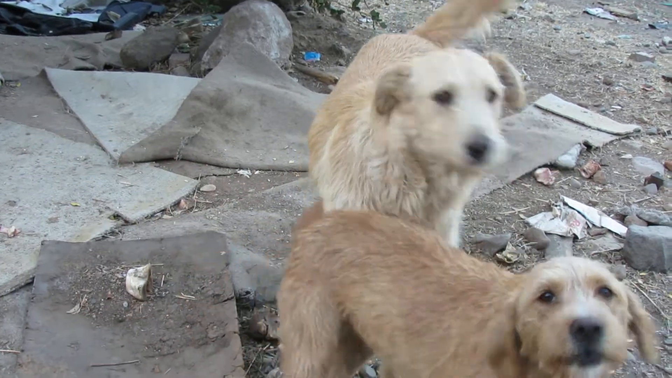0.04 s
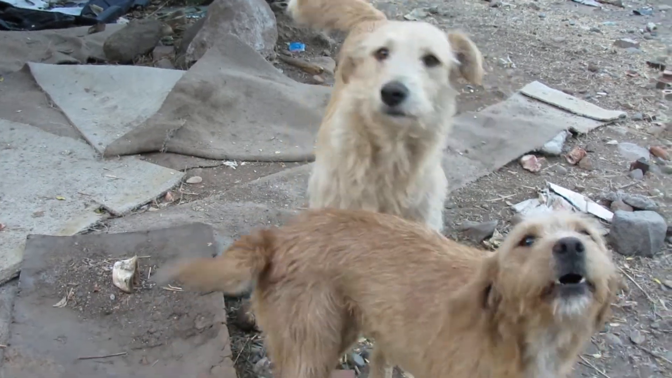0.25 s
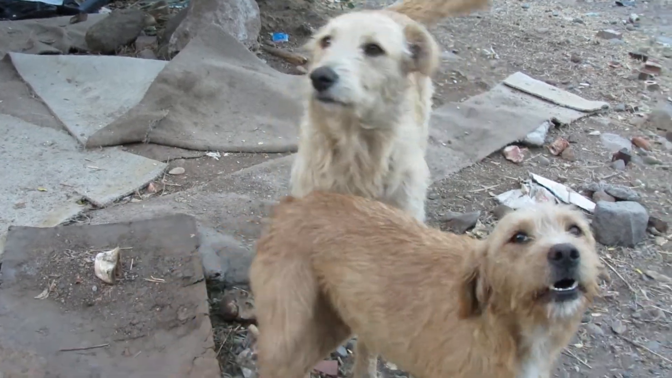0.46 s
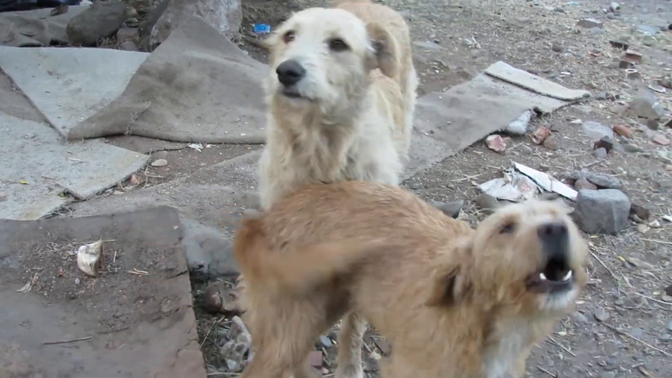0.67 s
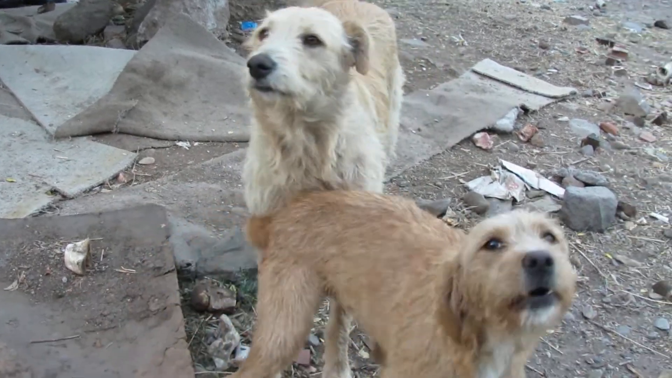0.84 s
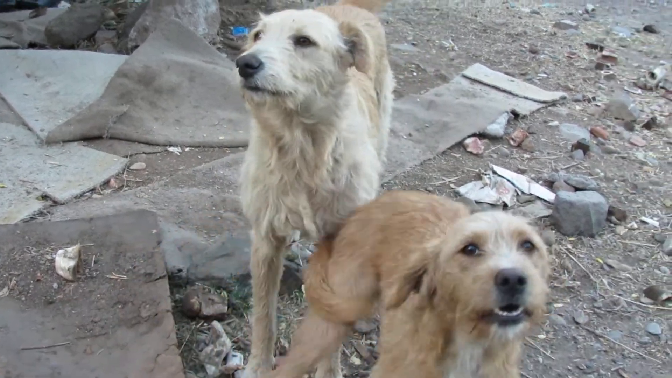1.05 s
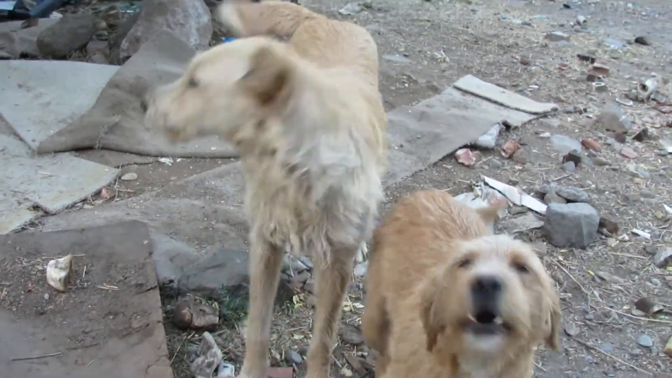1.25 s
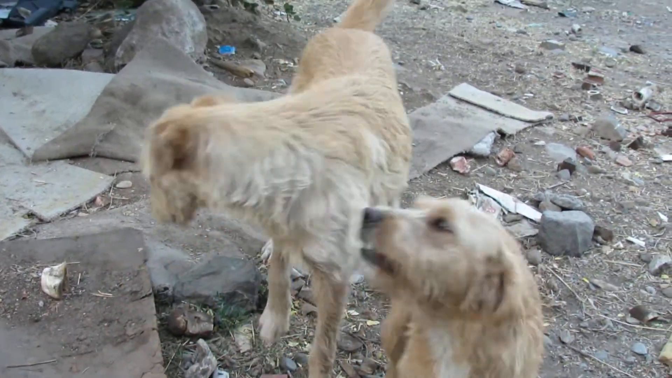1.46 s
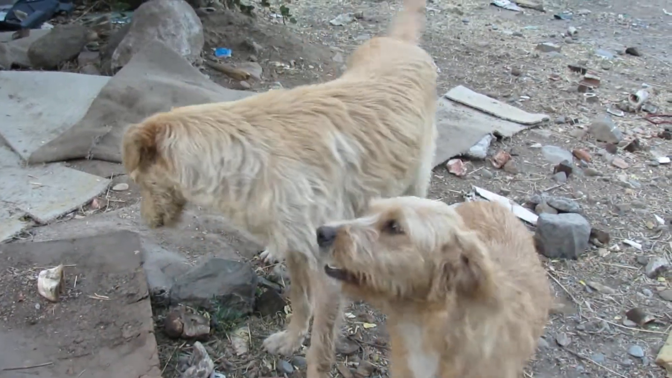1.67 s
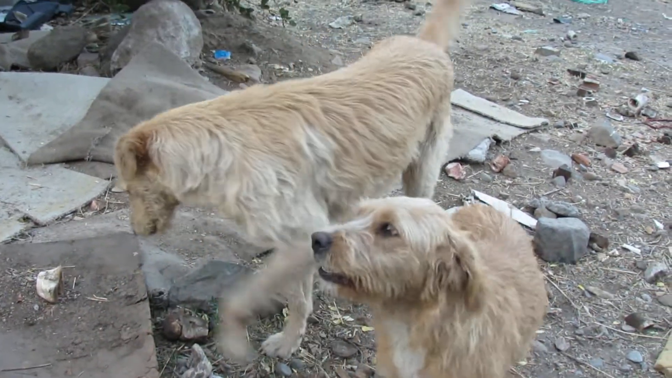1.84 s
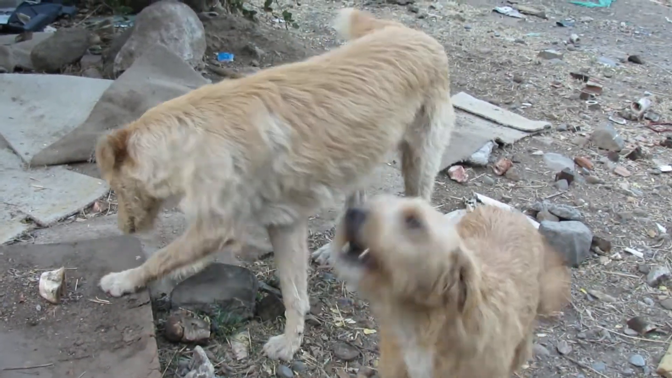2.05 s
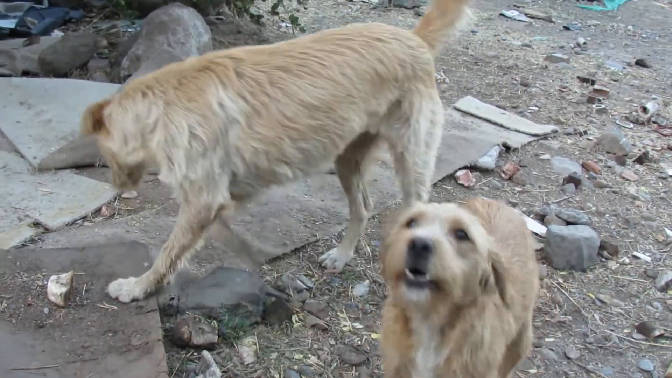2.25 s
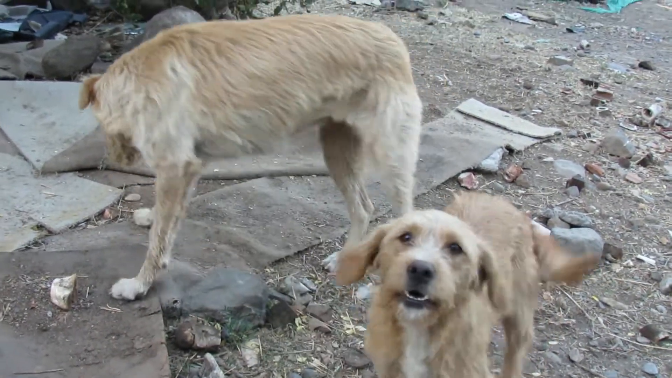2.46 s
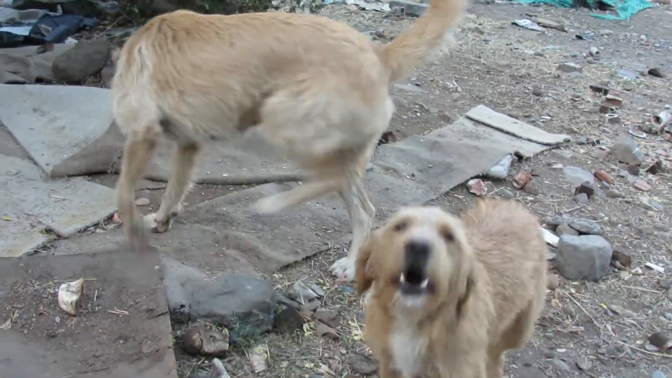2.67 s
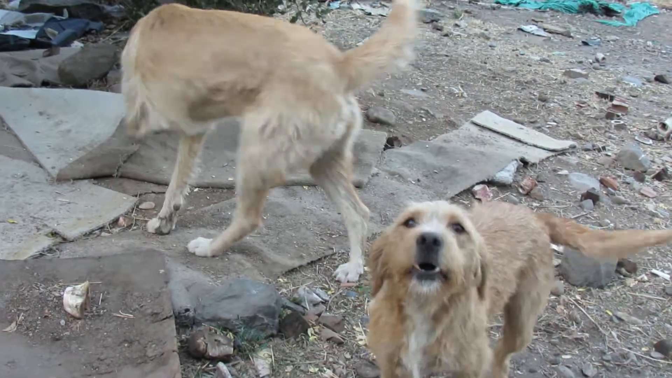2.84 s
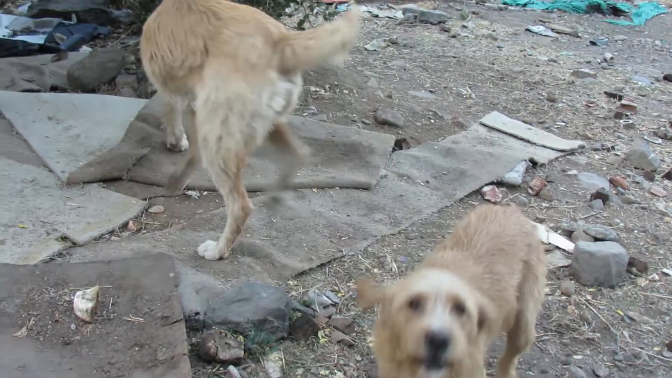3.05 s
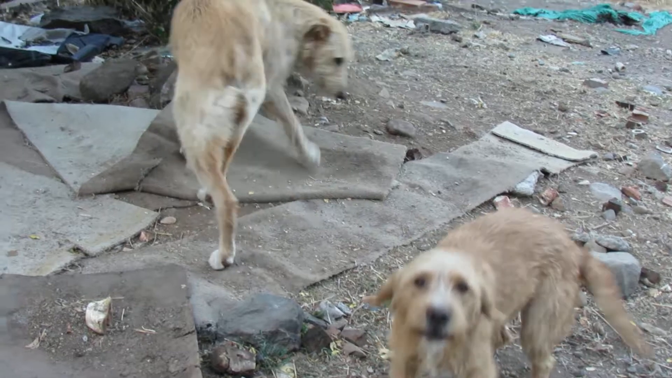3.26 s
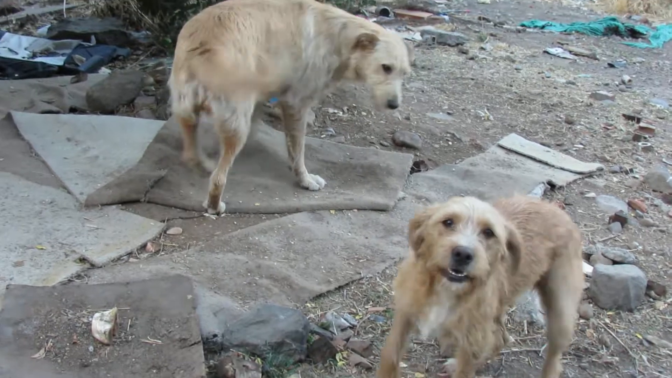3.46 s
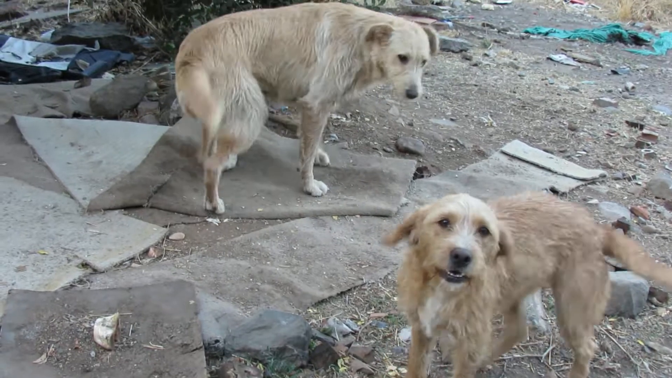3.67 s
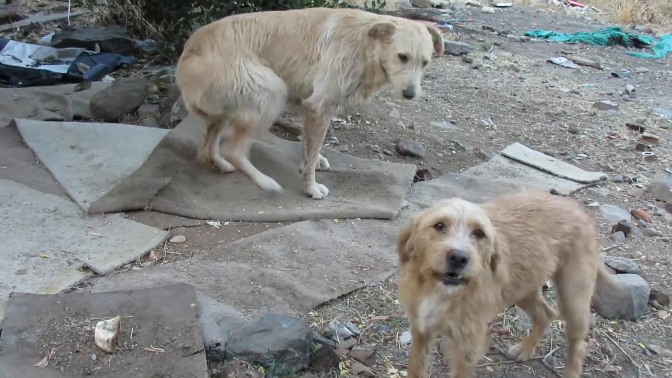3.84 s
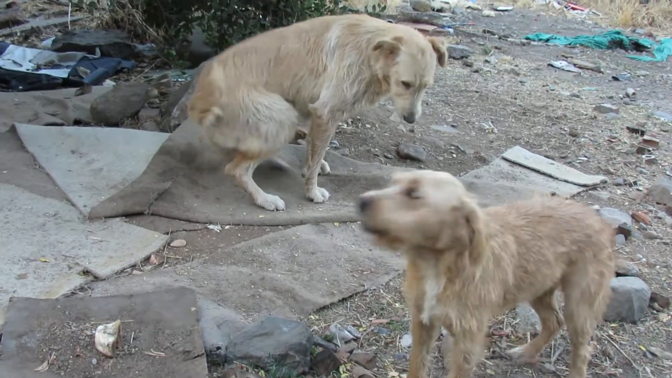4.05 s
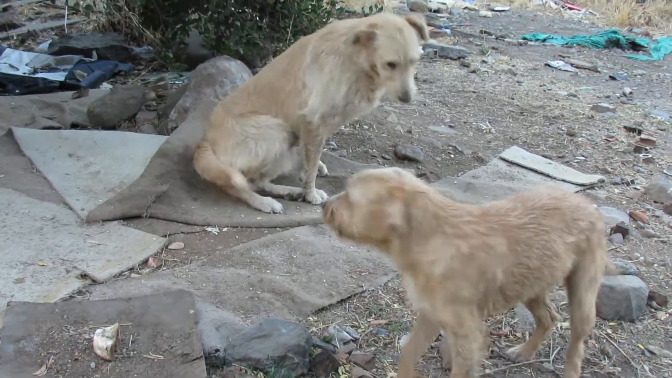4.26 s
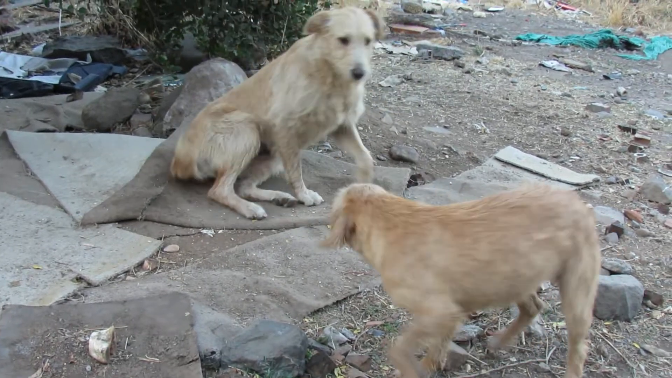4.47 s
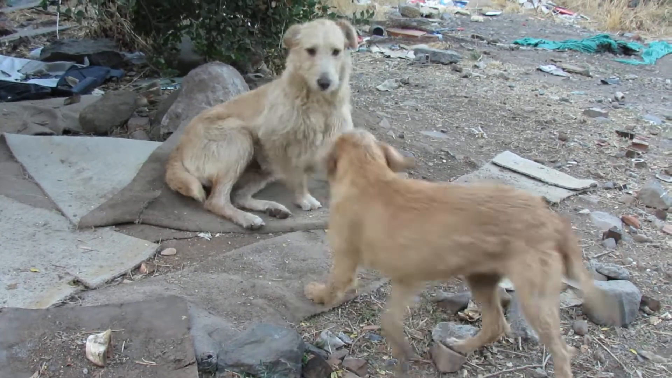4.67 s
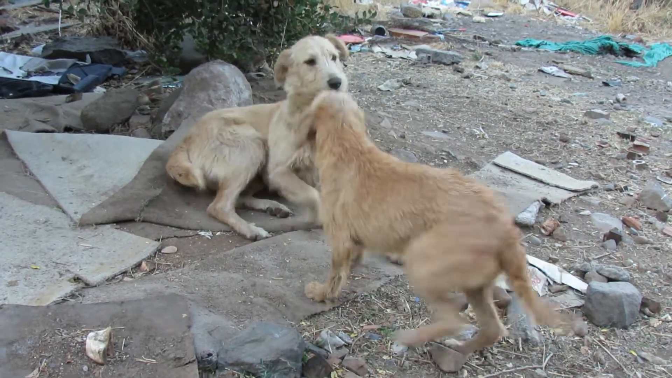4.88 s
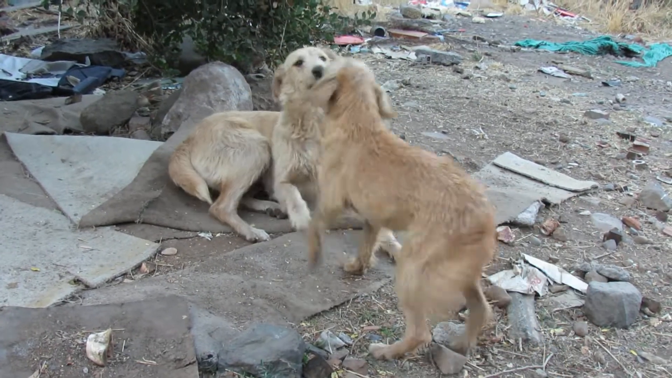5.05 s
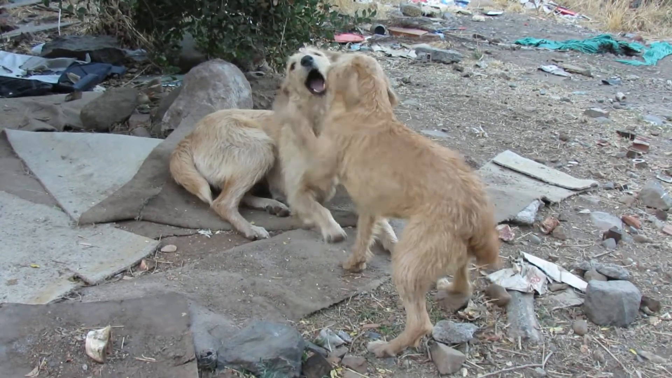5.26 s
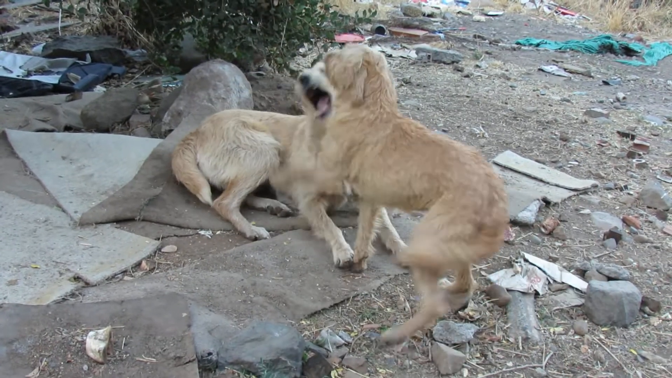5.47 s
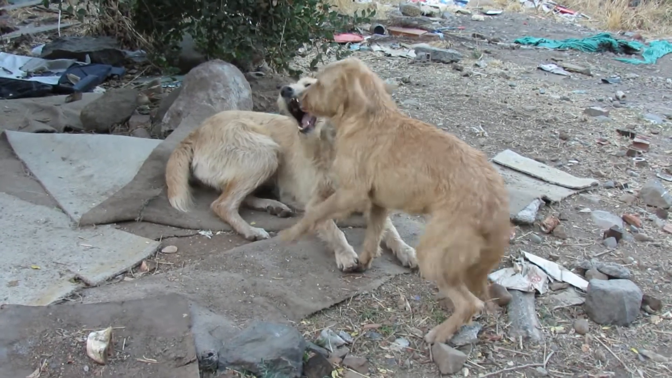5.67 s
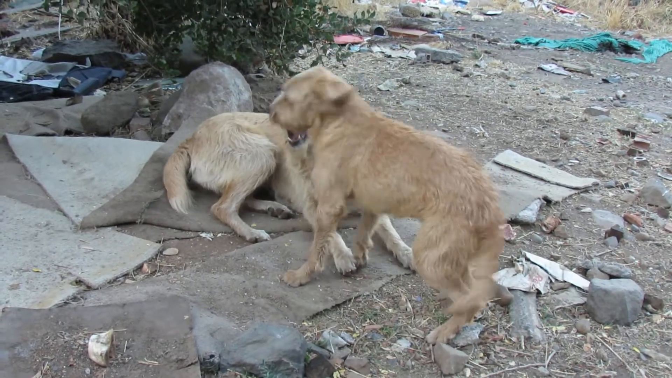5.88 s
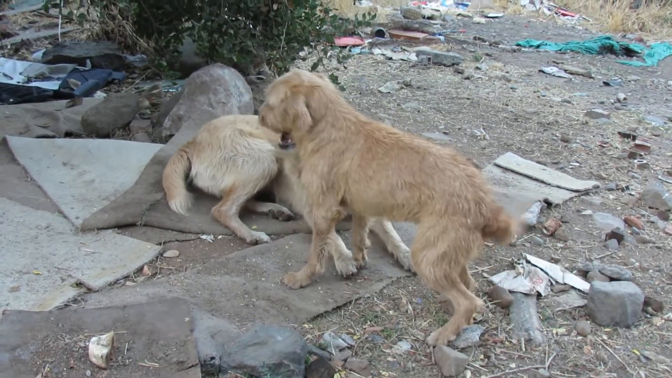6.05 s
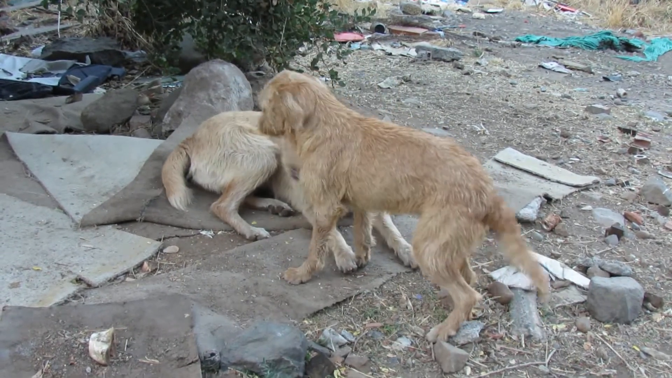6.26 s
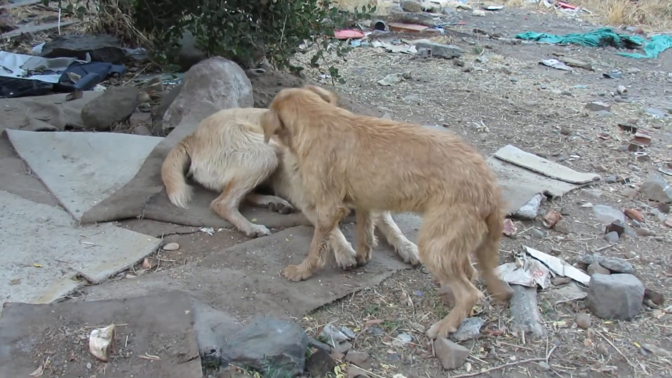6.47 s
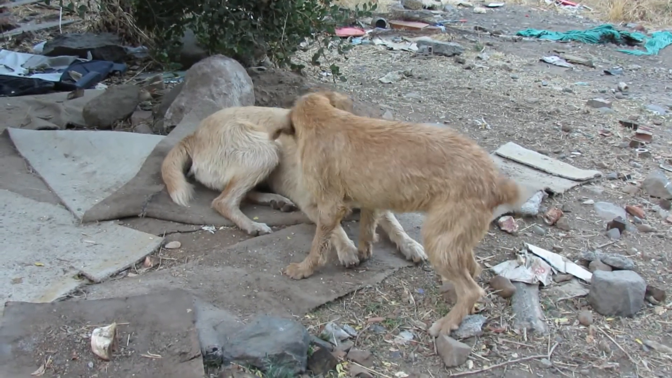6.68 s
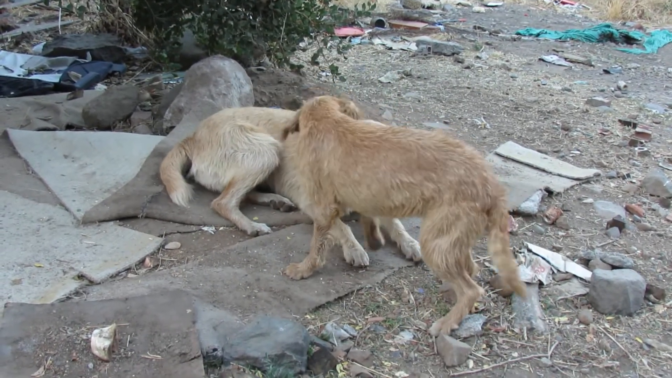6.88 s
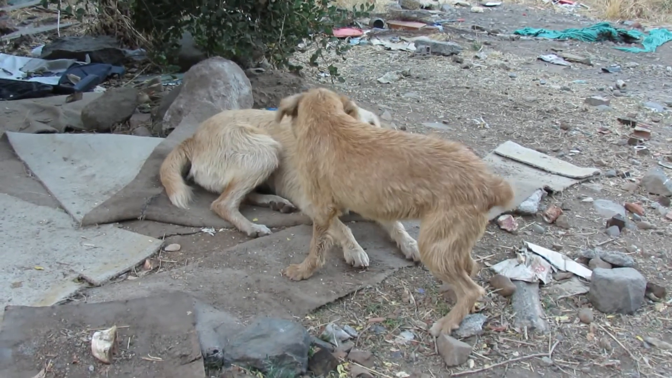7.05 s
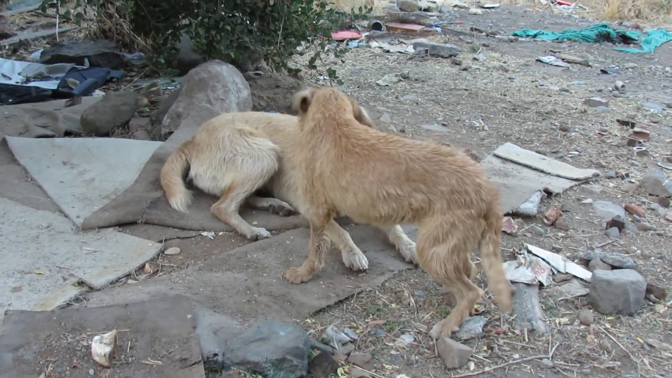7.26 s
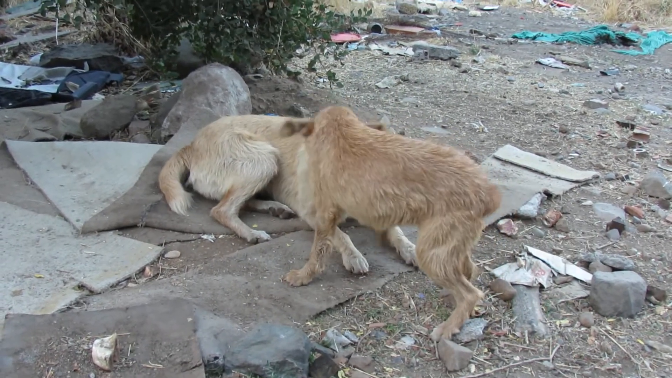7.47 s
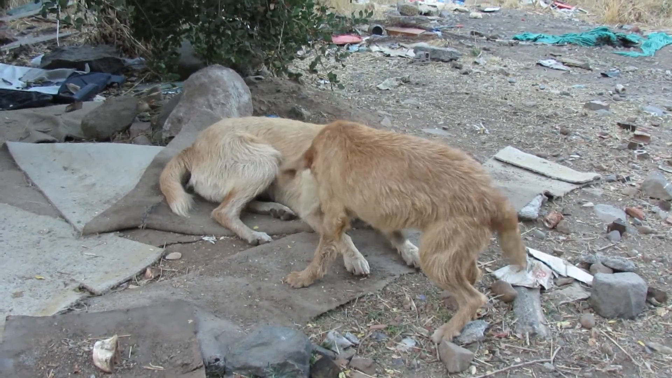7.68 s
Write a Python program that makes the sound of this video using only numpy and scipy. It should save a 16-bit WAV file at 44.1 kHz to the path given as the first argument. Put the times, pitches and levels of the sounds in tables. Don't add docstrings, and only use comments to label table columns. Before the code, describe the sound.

Rough, spaced dog barks close by on littered ground, paws crunching grit, glass tinkling briefly, then a thin whine and swelling distant hiss.

```python
import sys
import numpy as np
from scipy import signal
from scipy.fft import rfft, irfft, next_fast_len
from scipy.io import wavfile
from scipy.ndimage import uniform_filter1d, map_coordinates

SR = 44100
rng = np.random.default_rng(int(sys.argv[2]) if len(sys.argv) > 2 else 0)


def bounce(signal):
    frames = np.transpose(np.atleast_2d(signal))
    limited = np.clip(frames, -1, 1)
    pcm = np.round(limited * 32767).astype(np.int16)
    wavfile.write(sys.argv[1], SR, pcm)


def invert_db(level):
    return 10 ** (np.asarray(level, dtype=float) / 20)


N = 340452

# start t/s, jaw starts to close after t/s, voice stops after t/s, effort level/dB, pitch f/Hz
BARK_CUES = [
    (0.08, .112, 0.13, -3.5, 536.1),
    (0.668, 0.11, 0.13, -7.5, 515),
    (1.279, 0.1, 0.11, -6, 527.7),
    (2.035, .105, 0.13, -7, 500.1),
    (2.661, 0.11, .138, -7.5, 496.1),
    (3.302, .024, .038, -17, 565),
    (3.881, 0.1, 0.12, -5.5, 540.9),
]
DUCKED_DB = -64.5


def unit(x):
    return x / np.sqrt(np.mean(x ** 2) + 1e-20)


def along(points, hz):
    f, v = np.transpose(points)
    return np.interp(np.log(hz + 1), np.log(f + 1), v)


def curves(rows):
    s, *cols = np.transpose(rows)
    return [np.interp(np.arange(N) / SR, s, c) for c in cols]


def sounding(rows):
    t = np.arange(N) / SR
    return np.clip(np.minimum(t - rows[0][0], rows[-1][0] - t) / 0.0041, 0, 1)


def wobble(rate):
    knots = rng.standard_normal(int(N * rate / SR) + 4)
    return map_coordinates(knots, [np.arange(N) * rate / SR])


def filtered(x, response):
    m = next_fast_len(N + SR // 2)
    return irfft(rfft(x, m) * response(np.fft.rfftfreq(m, 1 / SR)), m)[..., :N]


def resonant(x, modes, order=1):
    def shape(f):
        total = 0
        for k, (center, width, db) in enumerate(modes):
            peak = 1j * f * width / (center * center - f * f + 1j * f * width)
            total = total + (-1) ** k * invert_db(db) * peak ** order
        return total
    return unit(filtered(x, shape))


def coloured(x, modes):
    return resonant(x, modes, order=2) * np.sqrt(np.mean(x ** 2))


def sliding(x, modes, scale):
    clock = np.cumsum(scale) * (N - 1) / np.sum(scale)
    warped = map_coordinates(x, [np.interp(np.arange(N), clock, np.arange(N))])
    modes = [(hz * np.mean(scale), width_hz, db) for hz, width_hz, db in modes]
    return map_coordinates(resonant(warped, modes, order=2), [clock])


def rush(spectrum, alike, patchy_db):
    z = signal.stft(rng.standard_normal((2, N)), nperseg=512)[2]
    field = uniform_filter1d(rng.standard_normal(z.shape[1:]), 6, 0)
    field = uniform_filter1d(field, 14, 1)
    pair = signal.istft(z * invert_db(patchy_db * unit(field)), nperseg=512)[1][:, :N]

    def mid_side(hz):
        turn = np.arccos(np.clip(along(alike, hz), -1, 1)) / 2
        return invert_db(along(spectrum, hz)) * np.array([np.cos(turn), np.sin(turn)])
    mid, side = filtered(pair, mid_side)
    return unit(np.array([mid + side, mid - side]))


def add(track, s, sound):
    at = round(s * SR)
    track[..., at:at + sound.shape[-1]] += sound


def strikes(events, t60):
    track, t = np.zeros(N + SR), np.arange(SR // 8) / SR
    for s, db in events:
        add(track, s, invert_db(db - 60 * t / t60) * rng.standard_normal(len(t)))
    return track[:N]


def since(starts):
    t = np.arange(N) / SR
    latest = np.clip(np.searchsorted(starts, t) - 1, 0, None)
    return latest, t - np.asarray(starts)[latest]


def humps(rows, rise_db_per_s, fall_db_per_s):
    t = np.arange(N) / SR
    power = 0
    for s, hold, db in rows:
        rise = rise_db_per_s * np.maximum(s - t, 0)
        fall = fall_db_per_s * np.maximum(t - s - hold, 0)
        power = power + invert_db(db - rise - fall) ** 2
    return np.sqrt(power)


def pumping():
    _, t = since([s for s, _, _, db, _ in BARK_CUES if db > -15])
    back = np.maximum(t - 0.36, 0)
    quick_db = 5 * (1 - np.exp(-back / 0.29))
    creep_db = 4.5 * back
    return np.where(t < 0, -38, DUCKED_DB + quick_db + creep_db)


def background():
    # f/Hz, density level/dB
    rumble_spectrum = [(12, -50), (20, -16.5), (54, -4), (101, -3.5), (189, -2), (231, 2), (600, -18.5),
                       (780, -29.5), (1320, -120)]
    hiss_spectrum = [(180, -25.5), (300, -5.5), (367, -4), (462, -4.5), (1030, -5.5), (3180, -17),
                     (4070, -19.5), (4540, -23), (5060, -22.5), (12000, -46.5), (15600, -79.5),
                     (22000, -120)]
    rustle_spectrum = [(1200, -35.5), (2500, 2), (4000, -6.5), (7000, -5), (12000, -11), (16000, -14.5),
                       (17000, -59)]
    # f/Hz, density level/dB
    self_noise = [(2000, -33), (6000, -1), (16000, -10.5)]
    # f/Hz, likeness [0..1]
    likeness = [(60, 0.092), (180, 0.41), (550, 0.14), (1650, 0.12), (4970, 0.2), (15000, 0.32)]
    # start t/s, length t/s, hiss level/dB, rumble level/dB
    swells = [(0.067, 0.058, -48, -40), (0.492, 0.16, -58, -69.5), (1.131, 0.1, -57, -64),
              (1.872, .18, -60, -63), (2.498, 0.14, -62.5, -65.5), (3.35, 0.096, -51.5, -58),
              (3.509, .2, -59.5, -56.5), (3.742, 0.093, -52, -55), (4.633, 0.12, -62, -63),
              (4.906, .08, -70, -59.5), (6.067, 0.18, -78, -51.5)]
    # start t/s, length t/s, level/dB
    brushes = [(0.015, .04, -46), (0.5, 0.078, -63.5), (1.12, .12, -68.5), (1.46, 0.043, -72.5),
               (1.585, 0.011, -68), (1.69, .08, -76), (1.88, 0.034, -62.5), (2.362, 0.011, -71.5),
               (2.57, 0.06, -69.5), (2.888, .01, -72), (2.96, .09, -66.5), (3.06, 0.0173, -62.5),
               (3.213, .012, -58), (3.4, 0.037, -58), (3.5, 0.036, -66), (3.585, 0.02, -58),
               (3.788, 0.021, -55.5), (4.305, 0.013, -71.5), (4.366, .03, -65), (4.5, .06, -73),
               (4.68, .02, -63.5), (4.85, 0.19, -67.5), (5.07, .03, -64), (5.46, .2, -69.5),
               (5.785, .03, -63), (6.228, .01, -76.5), (6.7, .1, -83.5)]

    hiss_db = pumping()
    hiss_swell = humps([(s, hold, db) for s, hold, db, _ in swells], 252, 252)
    rumble_swell = humps([(s, hold, db) for s, hold, _, db in swells], 252, 252)
    rumble = np.hypot(invert_db(hiss_db - 3.5), rumble_swell)
    hiss = np.hypot(invert_db(hiss_db), hiss_swell)
    still_rustle_db = -81.5 + 0.17 * (hiss_db - DUCKED_DB)
    rustle = np.hypot(invert_db(still_rustle_db), humps(brushes, rise_db_per_s=2500, fall_db_per_s=701))

    far = rumble * invert_db(3.0 + 0.4 * wobble(7)) * rush(rumble_spectrum, likeness, patchy_db=2.0)
    far += hiss * invert_db(5.0 + 0.23 * wobble(6.2)) * rush(hiss_spectrum, likeness, patchy_db=-1.33)
    far += np.sqrt(hiss) * invert_db(-52) * rush(self_noise, [(3000, .1)], patchy_db=1.4)
    grains = unit(invert_db(4 * wobble(300)))
    return far + rustle * invert_db(6.0) * grains * rush(rustle_spectrum, [(3000, 0.26)], patchy_db=1.6)


def gesture():
    latest, t = since([row[0] for row in BARK_CUES])
    close_s, stop_s, db, top_hz = np.transpose(BARK_CUES)[1:, latest]
    opened = np.clip((t - 0.026) / 0.03, 0, 1)
    closed = np.clip((t - close_s) / 0.021, 0, 1)
    gape = opened * (1 - closed)
    after = np.maximum(t - stop_s, 0)

    hard_db = -6.5
    attack_db_per_s = 1303.5 * invert_db(1.2 * (np.maximum(db, -9) - hard_db))
    on_db = db - np.clip(20.5 - attack_db_per_s * t, 0, 120) - 120 * (t < 0)
    voice_db = on_db - 829 * after
    chest_db = voice_db - 10 * gape - 67.5 * t
    shut_db, open_db, end_db = -6, -3.5, -18
    mouth_db = voice_db + shut_db + (open_db - shut_db) * opened + (end_db - open_db) * closed
    shut_db, open_db, end_db = -24.5, -28, -34
    rasp_db = on_db + shut_db + (open_db - shut_db) * opened + (end_db - open_db) * closed
    rasp_db = rasp_db - 601.5 * after

    scoop = .15 * invert_db(.6 * (db - hard_db)) * np.exp(-np.abs(t) / .028)
    hz = np.maximum(top_hz * (1 - scoop) - 4200 * opened * after, 319.4)
    hz = hz * (1 + .03 * wobble(30))
    jaw_hz = 1.79 * top_hz * (.9 + .1 * opened) - 14000 * np.maximum(t - close_s, 0)
    jaw_hz = np.maximum(jaw_hz, 700) * (1 + .03 * wobble(45))
    lips_hz = (5990 + 1600 * np.clip(t, 0, .2)) * (1 + .025 * wobble(22))
    tongue = 1.13 - .13 * opened
    return hz, invert_db(chest_db), invert_db(mouth_db), invert_db(rasp_db), jaw_hz, lips_hz, tongue


def mixed(clear, noise, share):
    return np.sqrt(1 - share) * clear + np.sqrt(share) * noise


def vocal_folds(hz):
    phase = 2 * np.pi * np.cumsum(hz * (1 + .035 * wobble(200))) / SR
    uneven = invert_db(2.0 * wobble(110))
    paired = 1 + 0.92 * np.clip(.5 + .5 * wobble(25), 0, 1) * np.cos(phase / 2)
    slap = unit(uneven * paired * sum(np.cos(k * phase) for k in range(1, 25)))
    breath = unit(rng.standard_normal(N) * (1 + 1.4 * np.cos(phase)))
    return unit(uneven * np.cos(phase)), slap, breath


def chest_tone(fundamental, breath, gain):
    # f/Hz, width f/Hz, level/dB
    chest_modes = [(594.6, 438, 0)]
    puff_modes = [(45, 60, -13), (134, 90, 0)]
    chest = mixed(fundamental, resonant(breath, chest_modes, order=3), .28)
    puff = gain * invert_db(-22.5) * resonant(breath, puff_modes, order=2)
    return gain * (chest + puff)


def mouth_tone(slap, breath, jaw_hz, tongue):
    # f/Hz, width f/Hz, level/dB
    jaw_modes = [(1050, 195, 0)]
    tongue_modes = [(1607, 230, 4.5), (1940, 260, -13)]
    cheek_modes = [(759.5, 250, 0)]
    hoarse = mixed(slap, breath, .55)
    mouth = sliding(hoarse, jaw_modes, jaw_hz / 1000)
    mouth += invert_db(-4.5) * sliding(mixed(slap, breath, .5), tongue_modes, tongue * (jaw_hz / 1000) ** .3)
    mouth += invert_db(-9 + 3 * wobble(40)) * resonant(hoarse, cheek_modes, order=2)
    return invert_db(-2.1) * mouth


def rasping(breath, lips_hz):
    # f/Hz, width f/Hz, level/dB
    rasp_modes = [(2400, 600, -6), (2960, 260, 0)]
    lip_modes = [(3600, 360, -3), (5200, 700, -22), (6100, 550, -2), (7200, 450, -13), (8400, 560, -12),
                 (9700, 700, -16), (11400, 850, -18), (14000, 2500, -32)]
    throat = invert_db(3 * wobble(40)) * sliding(breath, rasp_modes, lips_hz / 6100)
    lips = invert_db(-1.5 + 3.9 * wobble(40)) * sliding(breath, lip_modes, lips_hz / 6300)
    return throat + lips


def snorts():
    # start t/s, hold t/s, level/dB
    blows = [
        (0.222, 0.0092, -50),
        (0.81, 0.0083, -49.5),
        (1.425, 0.024, -48.5),
        (2.18, 0.0073, -43),
        (2.815, 0.0076, -42.5),
        (3.348, .012, -36),
        (3.41, 0.049, -54),
    ]
    # f/Hz, width f/Hz, level/dB
    nose_modes = [(3150, 500, -5), (3850, 700, -3), (6100, 900, 0), (8200, 900, -10), (10000, 1500, -12),
                  (13500, 2500, -20)]
    gain = humps(blows, rise_db_per_s=468, fall_db_per_s=599.5) * invert_db(2 * wobble(72))
    return gain * resonant(rng.standard_normal(N), nose_modes, order=2)


def barks():
    moves = uniform_filter1d(gesture(), size=150)
    hz, chest_gain, mouth_gain, rasp_gain, jaw_hz, lips_hz, tongue = moves
    fundamental, slap, breath = vocal_folds(hz)
    voice = chest_tone(fundamental, breath, chest_gain)
    voice += mouth_gain * mouth_tone(slap, breath, jaw_hz, tongue)
    return voice, invert_db(-.5) * (rasp_gain * rasping(breath, lips_hz) + snorts())


def yard(x):
    # f/Hz, t60 t/s
    decay = [(200, 0.062), (1500, 0.19), (3500, 0.22), (10000, 0.1)]
    hz, t, z = signal.stft(rng.standard_normal((2, SR // 2)), SR, nperseg=256)
    tail = signal.istft(z * invert_db(-60 * t / along(decay, hz)[:, None]), SR, nperseg=256)[1]
    delayed = np.pad(x, (200, 0))[None]
    return signal.fftconvolve(delayed, tail / np.linalg.norm(tail[0]), axes=1)[:, :N]


def scattered(x):
    scatter = rng.standard_normal((2, 200)) * invert_db(-60 * np.arange(200) / SR / 0.0032)
    scatter /= np.linalg.norm(scatter, axis=1, keepdims=True)
    return signal.fftconvolve(x[None], scatter, axes=1)[:, :N]


def barking_dog():
    voice, rasp = barks()
    dog = voice * invert_db([[-3.2], [2.3]]) + invert_db(-16) * yard(voice)
    dog += rasp * invert_db([[-3.5], [-.4]]) + invert_db(-16) * yard(rasp)
    return dog + invert_db([[-4], [-4.5]]) * scattered(rasp)


def paw_thuds():
    # t/s, peak level/dB
    landings = [
        (0.518, -31.5),
        (0.591, -35.5),
        (1.15, -43.5),
        (1.22, -43.5),
        (1.858, -46.5),
        (2.903, -47),
        (3.304, -36),
    ]
    # f/Hz, width f/Hz, level/dB
    pad_modes = [(105.5, 90, -1), (254, 180, -6), (650, 590, -11.5)]
    return coloured(strikes(landings, t60=0.045), pad_modes) * invert_db([[-4.5], [-1.5]])


def grit():
    # t/s, peak level/dB, pitch f/Hz, left over right level/dB
    chips = [(0.519, -46.5, 5500, -9.5), (0.652, -43.5, 2170, -5.5), (0.592, -40.5, 3593, -8.5),
             (1.135, -50, 3800, -0.5), (1.1737, -54, 3700, -9), (1.1851, -38, 3150, 2.5),
             (1.5903, -49, 12280, -3), (1.7135, -51, 6600, 3), (1.8949, -34.5, 4780, -0.5),
             (2.9625, -47, 3840, 0), (2.9727, -39.5, 3790, -2), (3.1098, -54, 3200, -0.5),
             (3.4392, -56.5, 3330, -0.5), (3.5219, -45, 7760, -6), (3.5686, -39, 3530, -10),
             (3.5871, -40.5, 4650, 1.5), (3.5995, -37, 7660, 2.5), (3.789, -40, 8920, -7),
             (4.369, -49, 3470, -5), (4.6886, -41, 7000, -2.5), (5.0865, -47, 5910, -1.0),
             (5.4807, -41, 3040, 0.5), (5.5581, -42.5, 3040, 2), (5.7997, -48.5, 3770, 4.5),
             (6.2296, -42.5, 5050, 0)]
    ground, t = np.zeros((2, N + SR)), np.arange(SR // 4) / SR
    for s, db, hz, pan_db in chips:
        chip = signal.iirpeak(hz, 1.3, SR)
        crack = signal.lfilter(*chip, rng.standard_normal(len(t)) * invert_db(-60 * t / 0.0062))
        add(ground, s, invert_db(db + 3.0) * crack * invert_db([[pan_db / 2], [-pan_db / 2]]))
    return ground[:, :N]


def glass_shard():
    # t/s, peak level/dB, crack over ring level/dB, upper ring level/dB, top ring level/dB
    bounces = [
        (3.0206, -42.5, 13, -14.5, 7),
        (3.026, -43.5, 23, -11, -2.5),
        (3.0374, -60.5, -17, -14.5, -18),
        (3.0664, -58, 1, 0, 11),
        (3.1454, -34.5, 3.5, -10, -47),
        (3.2144, -34.5, -24, 7.5, -19),
        (3.2237, -41.5, 3, 3, -34),
        (3.272, -41.5, 4, -5.5, -32),
        (3.3134, -42, 9, -13.5, -20),
    ]
    # f/Hz, t60 t/s
    glass_modes = [(6767, .08), (7600, .1), (11900, .06)]
    # f/Hz, width f/Hz, level/dB
    crack_modes = [(2750, 2900, 4), (7500, 3000, -3)]
    rings, t = np.zeros(N + SR), np.arange(SR // 4) / SR
    for s, db, _, *upper_db in bounces:
        ring = 0
        for level, (hz, t60) in zip([0, *upper_db], glass_modes):
            ring = ring + invert_db(level - 60 * t / t60) * np.sin(2 * np.pi * hz * t)
        add(rings, s, invert_db(db - 3.5) * ring)
    hits = [(s, db + crack_db - 7.0) for s, db, crack_db, *_ in bounces[:-1]]
    cracks = coloured(strikes(hits, t60=0.0131), crack_modes)
    return (rings[:N] + cracks) * invert_db([[-.7], [.7]])


def whine():
    # t/s, pitch f/Hz, level/dB
    glide = [
        (5.09, 1216, -73),
        (5.108, 1160, -64),
        (5.132, 1174, -52.5),
        (5.224, 1175, -50),
        (5.388, 1164, -63),
        (5.42, 1165, -60),
    ]
    hz, db = curves(glide)
    return invert_db(db + 3.5) * np.sin(2 * np.pi * np.cumsum(hz) / SR) * sounding(glide)


def scene():
    return background() + barking_dog() + paw_thuds() + grit() + glass_shard() + whine()


def low_pass(x):
    return signal.sosfilt(signal.butter(12, 16900, fs=SR, output="sos"), x)


def record(dry):
    keep = np.exp(-1 / (0.004 * SR))
    power = signal.lfilter([1 - keep], [1, -keep], np.mean(dry ** 2, axis=0))
    limited = dry / (1 + (power / invert_db(-11) ** 2) ** 2) ** (1 / 4)
    band = filtered(np.clip(limited, -1, 1), lambda hz: hz < 16400)
    return low_pass(band)


dry = scene()
out = record(dry)
bounce(out)
```